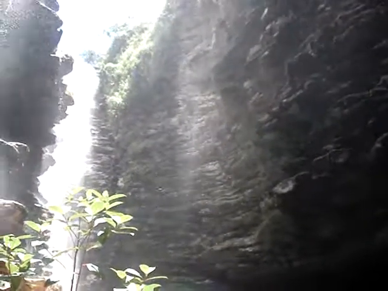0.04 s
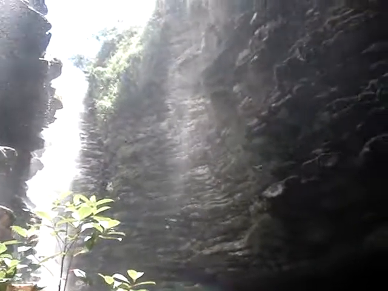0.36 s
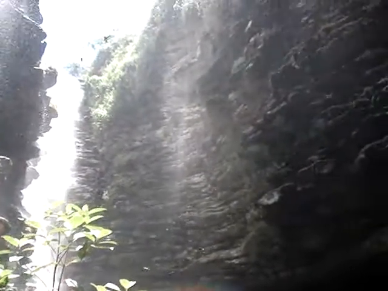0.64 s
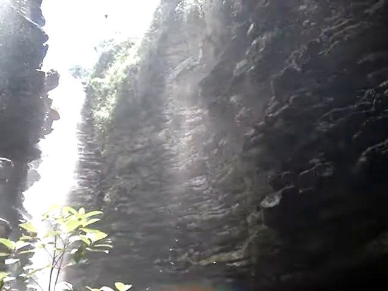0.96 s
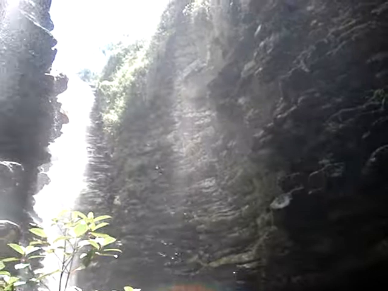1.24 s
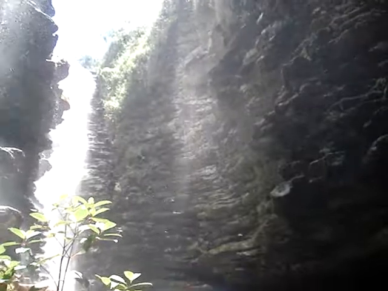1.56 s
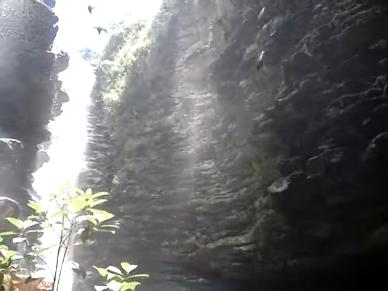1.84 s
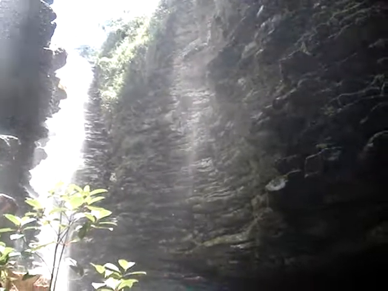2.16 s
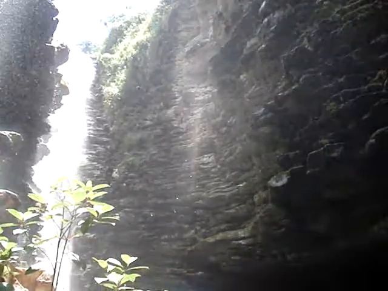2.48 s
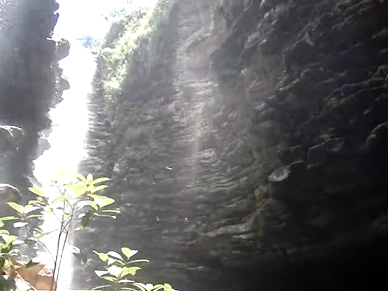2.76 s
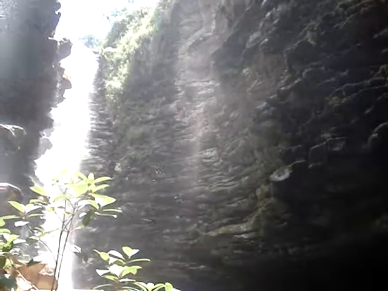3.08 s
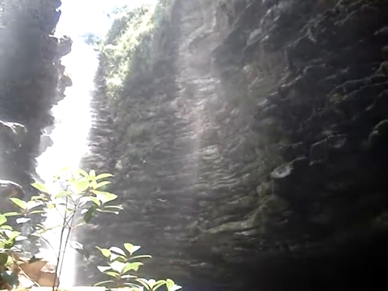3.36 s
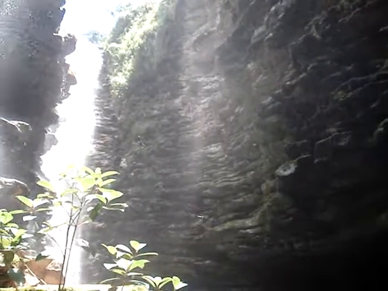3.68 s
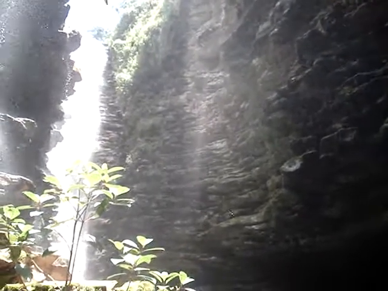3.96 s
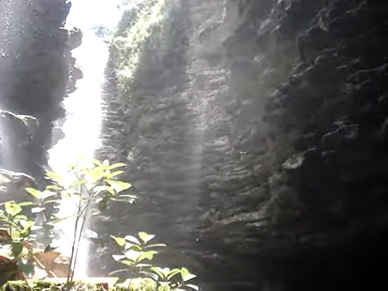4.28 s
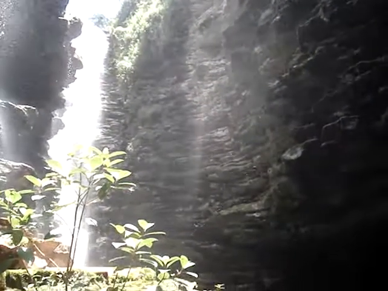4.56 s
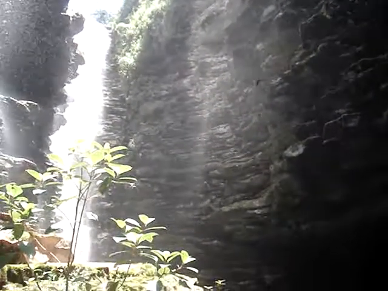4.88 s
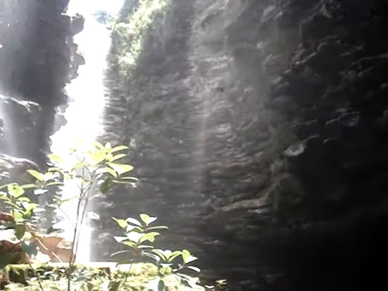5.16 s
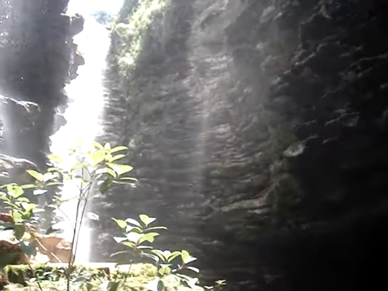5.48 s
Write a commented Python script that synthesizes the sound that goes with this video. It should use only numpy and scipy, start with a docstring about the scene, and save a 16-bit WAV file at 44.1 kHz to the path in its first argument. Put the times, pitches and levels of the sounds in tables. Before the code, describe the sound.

Steady falling water echoes off rock walls while screaming swift-like birds fly by in a shrill, falling whoosh, leaving faint distant chatter.

```python
"""Waterfall and swifts in a canyon

Countless splashes merge into a steady rush; rock walls smear a far colony's calls into a soft din.
A flock of swift-like birds sweeps past, its buzzing screams merging into a high, falling whoosh.
Each scream is a whistle chopped into rapid pulses. A few birds call close by, more chatter far off.
Puffs of air bump the one small microphone as the flock passes."""
import sys
import numpy as np
from scipy import signal
from scipy.fft import rfft, irfft, next_fast_len
from scipy.io import wavfile
from scipy.ndimage import uniform_filter1d

SR = 44100
rng = np.random.default_rng(int(sys.argv[2]) if len(sys.argv) > 2 else 0)


def output_pcm(signal):
    """Save a mono or channel-first signal as 16-bit PCM at the path in sys.argv[1].

    Samples are clipped to [-1, 1] before scaling.
    """
    pcm = np.clip(np.atleast_2d(signal).T, -1, 1) * 32767
    wavfile.write(sys.argv[1], SR, np.round(pcm).astype(np.int16))


N = 252693
TIME_S = np.arange(N) / SR

# falling water: freq_hz, relative_density_db
WATER_SPECTRUM = [(30, -35), (60, -29), (100, -14), (160, -13), (250, -7), (450, -3.5), (800, -0.85),
                  (1300, 0.0), (2300, -2), (3200, -8), (4200, -19.5), (6000, -12), (7500, -25),
                  (10000, -42)]
# treble contour, shared by colony din and spray: time_s, relative_level_db
TREBLE_CONTOUR = [(0.0, -33), (0.17, -37.5), (0.24, -30), (0.41, -34.5), (0.54, -32), (0.83, -36),
                  (1.32, -32.5), (2.22, -28), (2.79, -38), (4.0, -41), (4.07, -40.5), (4.26, -41.5),
                  (4.47, -36.5), (4.72, -44), (5.12, -36.5), (5.73, -48)]
# colony din off the rock walls: freq_hz, relative_density_db
DIN_SPECTRUM = [(1600, -27.5), (2200, -4), (2800, 3), (3500, 3), (4500, -2), (6000, -10.5), (7500, -21),
                (10000, -34)]
# breathy edge of the flock's screams: freq_hz, relative_density_db
BREATH_SPECTRUM = [(2500, -16.5), (4000, 12.5), (6000, 6), (7500, 5), (8300, -1.5), (9000, -4.5),
                   (10000, -12)]
# air puffs on the microphone: start_s, pressure_db
AIR_PUFFS = [(0.662, -25), (0.852, -23), (0.865, -19), (0.915, -20), (0.973, -22.5), (1.28, -24),
             (1.558, -25), (1.796, -26.5), (1.907, -25), (1.931, -27), (2.260, -31)]
# single screams: start_s, length_s, pitch_hz, glide_octaves, level_db
SINGLE_SCREAMS = [(0.795, 0.16, 6740, 0, -29), (1.11, 0.17, 4960, -0.0083, -25.5),
                  (1.251, 0.19, 4930, -0.067, -29), (1.429, 0.24, 5000, 0.015, -24.5),
                  (1.682, 0.25, 4800, 0, -31), (1.758, 0.09, 6130, 0.07, -28.5),
                  (1.88, 0.14, 6090, 0.1, -26.5), (1.915, 0.085, 5300, -0.086, -20.5),
                  (1.997, 0.11, 4930, -0.11, -27.5), (2.176, 0.028, 4130, 0.13, -24.5),
                  (2.199, 0.128, 5350, 0.1, -19), (2.506, 0.15, 4800, 0.15, -38),
                  (4.07, 0.15, 4750, 0.3, -36), (4.145, 0.1, 5970, 0.13, -35.5),
                  (4.418, 0.1, 3490, 0.04, -42), (5.09, 0.1, 5650, 0.18, -50)]


def from_db(db):
    """Decibels to gain."""
    return 10 ** (np.asarray(db) / 20)


def unit_rms(x):
    """Scale to unit rms."""
    return x / np.sqrt(np.mean(x ** 2) + 1e-20)


def drift(rate_hz, size=N):
    """Random wander of unit spread, rate_hz knots a second."""
    knots = rng.standard_normal(size // 8 + 2)
    return np.interp(np.arange(size) * rate_hz / SR, np.arange(len(knots)), knots) * np.sqrt(3 / 2)


def cut(x, hz, kind, order=2):
    """Causal low- or high-pass."""
    return signal.sosfilt(signal.butter(order, hz, kind, fs=SR, output="sos"), x)


def coloured_noise(spectrum):
    """Unit-rms noise with the given spectrum."""
    size = next_fast_len(N)
    hz, db = np.transpose(spectrum)
    log_bins = np.log(np.maximum(np.fft.rfftfreq(size, 1 / SR), 1))
    gain = from_db(np.interp(log_bins, np.log(hz), db))
    return unit_rms(irfft(rfft(rng.standard_normal(size)) * gain, size)[:N])


def treble_swing_db():
    """Treble contour about its mean."""
    level_db = np.interp(TIME_S, *np.transpose(TREBLE_CONTOUR))
    return level_db - level_db.mean()


def waterfall(level_db=-28, churn_db=0.3, spray_hz=2220, spray_db=-2.0, flutter_db=1.44):
    """Splashes merge into a rush; its top swells and sinks with the spray."""
    rush = coloured_noise(WATER_SPECTRUM)
    # zero-phase split: body and spray add in phase
    body = cut(cut(rush, spray_hz, "low")[::-1], spray_hz, "low")[::-1]
    spray = (rush - body) * from_db(spray_db + 0.13 * treble_swing_db() + flutter_db * drift(14))
    return from_db(level_db - churn_db * drift(16)) * (body + spray)


def colony(mean_db=-36, flutter_db=0.46):
    """Far calls, smeared by the walls into a soft din."""
    level_db = mean_db + 1.105 * treble_swing_db() + flutter_db * drift(25)
    return from_db(level_db) * coloured_noise(DIN_SPECTRUM)


def scream(pitch_hz, sweep, rasp, pulse_hz=323.3, overtone_db=-34):
    """A whistle chopped into rapid, unsteady chirps; sweep and rasp are fractions of the pitch."""
    size = len(pitch_hz)
    pulse_phase = 2 * np.pi * np.cumsum(pulse_hz * np.exp(0.2 * drift(40, size))) / SR
    chirp_hz = pitch_hz * (1 + sweep * np.sin(pulse_phase) + rasp * drift(1500, size))
    phase = 2 * np.pi * np.cumsum(chirp_hz) / SR
    whistle = np.sin(phase) + from_db(overtone_db) * np.sin(2 * phase)
    pulses = (1 + 0.99 * np.cos(pulse_phase)) * from_db(2.6 * drift(160, size))
    return unit_rms(pulses * whistle)


def canyon(x, wet_db, t60_s):
    """Direct sound plus a dense tail scattered by rough rock."""
    t = np.arange(SR) / SR
    tail = rng.standard_normal(SR) * from_db(-60 * t / t60_s) * (t > 0.008)
    wet = signal.fftconvolve(x, tail / np.linalg.norm(tail))[:len(x)]
    return (x + from_db(wet_db) * wet) / np.sqrt(1 + from_db(2 * wet_db))


def far_chatter(count=7, level_db=-43.5, calling_db=15.0, fade_from_s=4.2, fade_db_per_s=4):
    """Distant birds call on and off, half voice, half echo; they fade after the flock."""
    voices = 0
    for centre_hz in np.geomspace(4400, 6200, count):
        calling = from_db(calling_db * np.minimum(drift(11), 1))
        pitch_hz = centre_hz * np.exp(0.06 * drift(8))
        voices += calling * scream(pitch_hz, sweep=0.076, rasp=0.033)
    fade_db = fade_db_per_s * np.maximum(TIME_S - fade_from_s, 0)
    return from_db(level_db - fade_db) * unit_rms(canyon(voices, wet_db=0.0, t60_s=0.67))


def flock(count=14, level_db=-22.5, calling_db=3.0, lowpass_hz=7600):
    """Many birds scream at once; their common pitch climbs as they sweep in, sinks as they pass."""
    rest_hz, crest_hz = 4922, 6615
    crest_s, climb_s, sink_s = 0.80, 0.17, 0.23
    arrive_s, rise_db_per_s = 0.565, 233
    leave_s, fall_db_per_s = 1.96, 27
    breath_db, breath_db_per_octave = -13, 17
    passing = (TIME_S > 0.42) & (TIME_S < 2.9)
    t = TIME_S[passing]
    width_s = np.where(t < crest_s, climb_s, sink_s)
    common_hz = rest_hz + (crest_hz - rest_hz) / (1 + ((t - crest_s) / width_s) ** 2)
    spread = 0.245 * np.exp(-0.21 * (t - arrive_s))   # pitches draw together
    voices = 0
    for rank in np.linspace(-1, 1, count):
        # outlying pitches: fewer, fainter birds
        own_hz = common_hz * np.exp(spread * (rank + rank ** 3) / 2 + 0.027 * drift(14, len(t)))
        voice = scream(own_hz, sweep=0.078, rasp=0.04)
        voices += voice * from_db(calling_db * drift(16, len(t)) - 3.0 * abs(rank))
    blend = cut(canyon(voices, wet_db=-11.0, t60_s=0.32), lowpass_hz, "low", order=4)
    levelled = blend / np.sqrt(uniform_filter1d(blend ** 2, size=SR // 8))
    breath_gain = from_db(breath_db + breath_db_per_octave * np.log2(common_hz / rest_hz))
    breath = breath_gain * coloured_noise(BREATH_SPECTRUM)[passing]
    approach_db = rise_db_per_s * np.minimum(t - arrive_s, 0)
    recede_db = fall_db_per_s * np.minimum(leave_s - t, 0)
    out = np.zeros(N)
    out[passing] = (levelled + breath) * from_db(level_db + approach_db + recede_db)
    return out


def puffs(first_rise_s=0.00055, doubling_s=0.54, lowpass_hz=220, leak_hz=3.2):
    """Each puff pushes the diaphragm, which leaks back to rest; later pushes are slower."""
    out = np.zeros(N)
    for start_s, pressure_db in AIR_PUFFS:
        rise_s = first_rise_s * 2 ** ((start_s - AIR_PUFFS[0][0]) / doubling_s)
        age = np.clip((TIME_S - start_s) / rise_s, 0, 50)
        out += from_db(pressure_db) * age * np.exp(1 - age)
    return cut(cut(out, lowpass_hz, "low"), leak_hz, "high", order=1)


def single_birds(attack_s=0.0036, fade_share=0.33, far_below_db=-34):
    """Gliding screams: loud ones are harshest; faint ones cross the canyon with more echo."""
    near, far = np.zeros((2, N))
    for start_s, length_s, centre_hz, glide_octaves, level_db in SINGLE_SCREAMS:
        t = np.arange(int(length_s * SR)) / SR
        pitch_hz = centre_hz * 2 ** (glide_octaves * (t / length_s - 0.5))
        attack = np.clip(t / attack_s, 0, 1)
        fade = np.clip((length_s - t) / (fade_share * length_s), 0, 1)
        if level_db < far_below_db:
            bus, sweep = far, 0.055
        else:
            bus, sweep = near, np.interp(level_db, [-24.5, -21], [0.018, 0.11])
        call = from_db(level_db) * attack * fade * scream(pitch_hz, sweep, rasp=0.028)
        at = int(start_s * SR)
        bus[at:at + len(t)] += call[:N - at]
    return canyon(near, wet_db=-15.0, t60_s=0.6) + canyon(far, wet_db=-2.5, t60_s=0.6)


def scene():
    """Water, birds and puffs at one microphone, on both channels."""
    mono = waterfall() + colony() + far_chatter() + flock() + single_birds() + puffs()
    return np.stack([mono, mono])


def record(dry, threshold_db=-27.5, reduction_db_per_db=0.095, cutoff_hz=10000):
    """Gentle gain control on loud passages, then a steep low-pass."""
    power = cut(dry[0] ** 2, hz=6.8, kind="low", order=1)
    level_db = 10 * np.log10(np.maximum(power, 1e-12))
    gain = from_db(-reduction_db_per_db * np.maximum(level_db - threshold_db, 0))
    lowpass = signal.ellip(12, 0.1, 80, cutoff_hz, fs=SR, output="sos")
    return signal.sosfilt(lowpass, dry * gain)


dry = scene()
out = record(dry)
output_pcm(out)
```